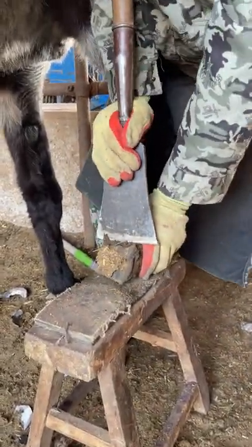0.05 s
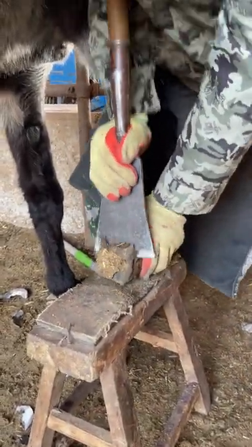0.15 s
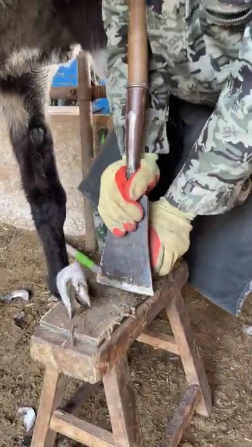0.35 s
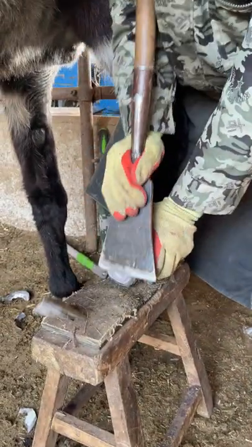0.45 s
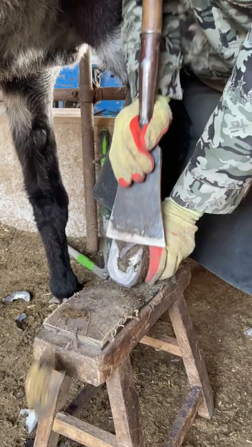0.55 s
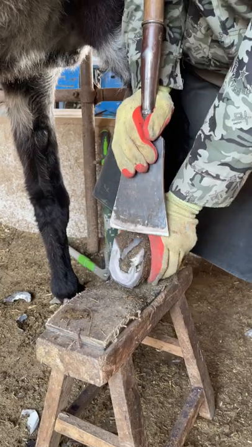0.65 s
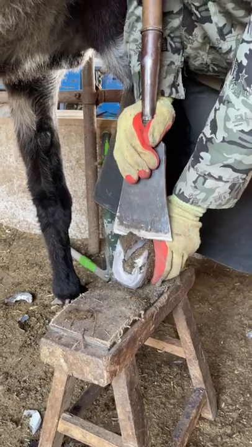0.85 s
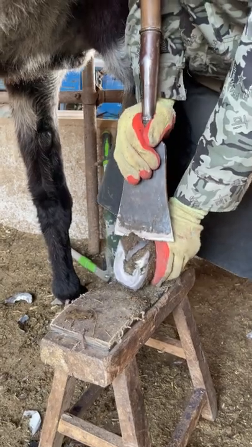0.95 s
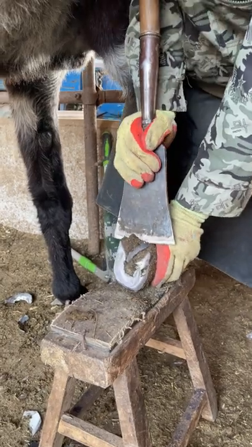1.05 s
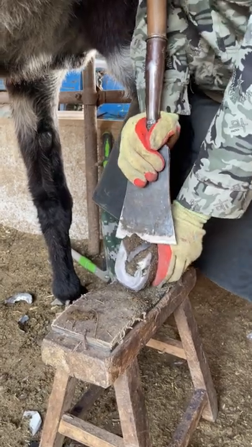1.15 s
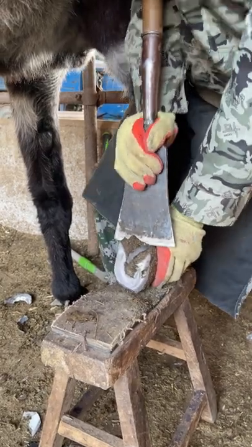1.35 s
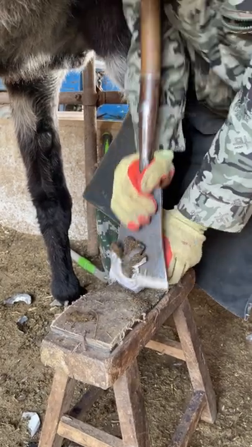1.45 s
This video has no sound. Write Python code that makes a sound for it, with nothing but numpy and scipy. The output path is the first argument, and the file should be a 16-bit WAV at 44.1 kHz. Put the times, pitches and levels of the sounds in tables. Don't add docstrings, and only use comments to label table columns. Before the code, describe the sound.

A blade cuts hoof with a brief rasping crunch, then knocks hard on a wooden stool; faint ticks and distant sparrows follow over low yard rumble, before a softer cut starts. Close stereo pickup, open shed.

```python
import sys
import numpy as np
from scipy import signal
from scipy.fft import rfft, irfft
from scipy.io import wavfile

SR = 44100
rng = np.random.default_rng(int(sys.argv[2]) if len(sys.argv) > 2 else 0)


def materialize(psi):
    bounded = np.clip(np.atleast_2d(psi).T, -1, 1)
    quanta = np.round(bounded * 32767).astype(np.int16)
    wavfile.write(sys.argv[1], SR, quanta)


def how_loud(loudness_db):
    steps = np.asarray(loudness_db, float) / 20
    return 10 ** steps


N = 66150

# (frequency [Hz], level [dB per Hz])
AIR_SPECTRUM = [(35, -1), (60, 4.5), (125, -6), (300, -18), (800, -31), (3000, -36.5), (6000, -40.5),
                (10000, -35.5)]
# (time [s], level [dB])
RUMBLE_SWELL = [(0, 1), (.15, 0), (.4, 5), (.57, -2), (.67, 4), (.76, -8), (.82, 3), (1.08, -1.5),
                (1.14, 4.5), (1.24, -1.5), (1.4, 2), (1.5, -4)]
# (time [s], level [dB])
RUSTLE_SWELL = [(0, -69), (.17, -67), (.33, -56), (.5, -59), (.67, -67.5), (.72, -76), (.78, -73),
                (.88, -74.5), (0.981, -73.5), (1.091, -65), (1.13, -78.5), (1.19, -65), (1.36, -67.5)]
# (time [s], level [dB], chatter share [0-1], chatter pitch [Hz])
FIRST_CUT = [
    (.15, -59, 0.06, 2595),
    (.19, -54, 0, 2604),
    (.2, -33.5, 0.13, 2600),
    (.212, -39, 0.33, 2608),
    (.23, -31, 0.7, 2845),
    (.244, -29.5, 0.36, 2950),
    (.267, -36, 0.1, 2806),
    (.272, -17.5, 1, 2552),
    (.277, -31.5, 0.2, 2540),
]
# (time [s], level [dB], chatter share [0-1], chatter pitch [Hz])
SECOND_CUT = [
    (1.37, -65, 0.2, 2414),
    (1.40, -58, 0.05, 2412),
    (1.418, -48, 0.15, 2468),
    (1.423, -40.5, 0.23, 2410),
    (1.45, -40, 0.06, 2298),
    (1.464, -37, 0.03, 2130),
    (1.5, -35, 0.01, 2240),
]
# (frequency [Hz], level [dB per Hz])
HORN_SPECTRUM = [(200, -3.5), (700, -6.5), (1800, -4), (4200, -7.5), (5700, -5.5), (9500, -3), (11500, -13),
                 (14500, -35)]
# (multiple of pitch, level [dB])
CHATTER_OVERTONES = [(1, -6.5), (2, -16.5), (3, -17), (4, -25)]
# (frequency [Hz], width [Hz], level [dB])
STOOL_SHAKE = [(85, 9.5, -1), (261, 43, -8)]
# (time [s], level [dB], frequency [Hz], width [Hz], t60 [s])
TICK_EVENTS = [(0.1994, -27.5, 1180, 695, 0.022), (0.227, -28, 2700, 600, 0.017),
               (.2395, -29, 3200, 600, 0.022), (.245, -34, 6400, 400, 0.018), (.249, -24, 2940, 600, 0.023),
               (0.415, -21.5, 9740, 2900, 0.015), (0.4697, -44, 5980, 6000, 0.035),
               (0.5469, -41, 1210, 1210, 0.019), (0.548, -42.5, 593, 70, 0.074),
               (0.639, -46.5, 990, 1013, 0.024), (0.694, -45, 2300, 504, 0.012),
               (0.7277, -31, 2200, 600, 0.011), (0.7283, -40, 3940, 900, .01),
               (.765, -39.5, 250, 60, 0.061), (0.766, -53, 527, 80, 0.072), (.778, -51, 2300, 910, 0.055),
               (0.7608, -49.5, 8230, 4880, 0.082), (0.760, -51, 1196, 1530, 0.086),
               (0.848, -41, 9740, 4950, 0.011), (0.914, -47, 8580, 4980, 0.014),
               (0.9745, -46.5, 6510, 2020, 0.021), (.992, -48, 5000, 6000, 0.014),
               (1.085, -63.5, 1197, 1210, .03), (1.174, -55, 5040, 6000, .1),
               (1.336, -44, 7100, 1500, 0.013), (1.344, -37.5, 1050, 350, 0.014),
               (1.405, -41, 6000, 8000, 0.0098), (1.419, -36, 2500, 4950, 0.0097),
               (1.4231, -29, 500, 300, 0.016), (1.4273, -26.5, 2100, 1600, 0.011),
               (1.4579, -20, 2178, 885, 0.013), (1.460, -25.5, 1290, 350, 0.032),
               (1.468, -28, 6330, 3000, 0.009), (1.475, -29, 1290, 400, .02),
               (1.479, -29, 5460, 500, 0.038), (1.497, -20.5, 5050, 7000, .015)]
# (time [s], level [dB], frequency [Hz], t60 [s])
STEEL_RINGS = [
    (.470, -60, 8200, .15),
    (.471, -62, 9650, .15),
    (.472, -58, 5080, .2),
    (.490, -64, 2350, .4),
    (.630, -69, 2350, .3),
    (.650, -63, 9600, .35),
    (.840, -69, 1720, 1.2),
    (.880, -63, 4700, .2),
    (.970, -70, 1720, .8),
]
# (time [s], level [dB], tilt [dB per octave])
EDGE_CONTACTS = [(.2750, -12, 5), (0.2766, -9.5, 2), (.2773, -1, 0.5), (.2788, -4.5, 2), (0.2794, -4, -3.5),
                 (0.2803, -5.5, -1), (.2816, -10.5, -5.5), (.2824, -9, -1.5), (0.2865, -16, -1),
                 (.2871, -23, -2), (0.2888, -21, -4)]
# (frequency [Hz], level [dB], t60 [s])
SEAT_MODES = [(600, -8.5, 0.0073), (787, -6.5, 0.011), (935, -11, 0.012), (1083, -6, 0.016),
              (1413, -4.5, 0.013), (1700, -7.5, 0.0088), (2098, -20, 0.013), (2392, -5.5, 0.017),
              (2877, -6, 0.013), (3420, -13, 0.012), (4110, -13.5, 0.0054), (6250, -24, .005),
              (7900, -22, 0.0054), (9930, -23.5, 0.011)]
# (start [s], level [dB], frequency [Hz], t60 [s], push length [s])
FRAME_THUDS = [
    (.2825, -24, 355, .05, .0015),
    (.2847, -7, 240, .045, .0015),
    (.2895, -8, 86, .11, .005),
    (.279, -22, 430, .03, .001),
]
# (frequency [Hz], level [dB per Hz])
ECHO_SPECTRUM = [(40, -9.5), (85, -0.5), (250, 0.5), (600, -15), (1300, -14.5), (5000, -28), (10000, -33.5),
                 (12000, -30)]
# (time [s], length [s], level [dB], start pitch [Hz], end pitch [Hz])
SPARROW_CHIRPS = [
    (0.497, 0.021, -46.5, 5190, 4610),
    (0.507, 0.048, -45, 4187, 3806),
    (0.729, 0.029, -48, 5290, 5030),
    (.762, 0.04, -44, 4310, 3747),
    (0.813, 0.028, -49, 3726, 2890),
    (1.172, 0.026, -51, 4400, 3885),
    (1.188, 0.06, -54, 3192, 2613),
    (1.22, 0.057, -55, 3900, 3400),
    (1.27, .05, -57, 3110, 2790),
    (1.188, 0.03, -57.5, 6580, 5900),
]
# (frequency [Hz], lead [half turns])
LEFT_LEAD = [(0, 0), (700, .12), (1950, 0), (3000, .4), (4300, .55), (5950, 2), (9150, 3), (11900, 4)]
# (frequency [Hz], level [dB])
PORT_TILT = [(50, 0.7), (400, -3.5), (1300, -2), (2000, 0)]
# (frequency [Hz], share [0-1])
PORT_DIFFERENCE = [(100, 0.03), (750, 0.4), (1400, 0.5), (3300, 0.5), (4300, 0.51), (4800, 0.43),
                   (5400, 0.7), (11000, 0.2)]
# (centre [Hz], width [Hz])
PHASE_LOCKS = [(1930, 340), (5950, 560), (9100, 900)]

TIME = np.arange(N) / SR
GRAINS_PER_S, GRAIN_SPREAD_DB = 20000, 2.0
CHATTER_WANDER, CHATTER_FLUTTER_DB = 0.11, 4.0
CRACK_S, CRACK_DB, CRACK_T60_S = 0.275, -21.5, 0.016
ECHO_S, ECHO_DB, ECHO_T60_S = 0.29, -32.5, 0.7
SHED_DB, SHED_T60_S, SHED_CUT_HZ = -11.5, 0.62, 5600
SMEAR_DB, SMEAR_T60_S = 0.5, 0.012


def rms_one(x):
    return x / np.sqrt(np.mean(x ** 2) + 1e-20)


def low_pass(x, order, hz):
    return signal.sosfilt(signal.butter(order, hz, fs=SR, output="sos"), x)


def at_hz(points, hz):
    table_hz, value = np.transpose(points)
    return np.interp(np.log(hz + 1), np.log(table_hz), value)


def colour(x, points):
    gain = how_loud(at_hz(points, np.fft.rfftfreq(N, 1 / SR)))
    return rms_one(irfft(rfft(x) * gain, N))


def drift(rate):
    r = np.exp(-2 * np.pi * rate / SR)
    settled = signal.lfilter([1], [1, -2 * r, r * r], rng.standard_normal(N + SR))[SR:]
    return rms_one(settled)


def ring(x, hz, t60):
    r, w = how_loud(-60 / (t60 * SR)), 2 * np.pi * hz / SR
    return signal.lfilter([0, np.sin(w)], [1, -2 * r * np.cos(w), r * r], x + 1e-18)


def resonance(x, hz, width_hz):
    r = np.exp(-np.pi * width_hz / SR)
    poles = [1, -2 * r * np.cos(2 * np.pi * hz / SR), r * r]
    return signal.lfilter([(1 - r * r) / 2, 0, (r * r - 1) / 2], poles, x)


def after(s, t60):
    t = TIME - s
    return (t >= 0) * how_loud(-60 * np.maximum(t, 0) / t60)


def tail(x, t60):
    decay = rng.standard_normal((2, N)) * after(0.0016, t60)
    decay = decay / np.sqrt(np.sum(decay[0] ** 2))
    return signal.fftconvolve(x[None], decay, axes=1)[:, :N]


def air():
    out = np.array([colour(rng.standard_normal(N), AIR_SPECTRUM) for side in range(2)])
    rumble = signal.sosfiltfilt(signal.butter(1, 138.6, fs=SR, output="sos"), out)
    out = out + rumble * (how_loud(np.interp(TIME, *np.transpose(RUMBLE_SWELL))) - 1)
    low = low_pass(out, 1, 2500)
    rustle_db = np.interp(TIME, *np.transpose(RUSTLE_SWELL))
    lift_db = np.minimum(rustle_db - np.median(rustle_db), 6)
    swell = how_loud(0.8 * lift_db + 1.0 * drift(15))
    patchy = how_loud(0.6 * drift(23))
    return how_loud(-42.5) * (low * patchy + (out - low) * swell)


def horn_rasp():
    size_db = GRAIN_SPREAD_DB * np.minimum(rng.exponential(1, N), 5)
    sizes = how_loud(size_db) * rng.choice([-1, 1], N)
    torn = rng.random(N) < GRAINS_PER_S / SR
    return colour(sizes * torn, HORN_SPECTRUM)


def edge_chatter(pitch):
    phase = 2 * np.pi * np.cumsum(pitch * (1 + CHATTER_WANDER * drift(300))) / SR
    out = 0
    for multiple, db in CHATTER_OVERTONES:
        out = out + how_loud(db + CHATTER_FLUTTER_DB * drift(220)) * np.cos(multiple * phase)
    return rms_one(out)


def stool_shake(pressure):
    noise, push = rng.standard_normal(N), np.minimum(pressure, how_loud(-37.5))
    out = 0
    for hz, width_hz, db in STOOL_SHAKE:
        steady = np.std(resonance(noise, hz, width_hz))
        out = out + how_loud(db) * resonance(push * noise, hz, width_hz) / steady
    return out


def cuts():
    pressure, share, pitch = 0, 0, 0
    for cut in (FIRST_CUT, SECOND_CUT):
        s, db, mix, hz = np.transpose(cut)
        inside = (TIME >= s[0]) & (TIME <= s[-1])
        pressure = pressure + inside * how_loud(np.interp(TIME, s, db))
        share = share + inside * np.clip(np.interp(TIME, s, mix), 0, 1)
        pitch = pitch + inside * np.interp(TIME, s, hz)
    edge = np.sqrt(1 - share) * horn_rasp() + np.sqrt(share) * edge_chatter(pitch)
    return pressure * edge + stool_shake(pressure)


def burst(noise, s, db, hz, width_hz, t60, rise_s):
    tone = rms_one(resonance(resonance(noise, hz, width_hz), hz, width_hz))
    return how_loud(db) * tone * after(s, t60) * np.clip((TIME - s) / rise_s, 0, 1)


def ticks():
    noise = rng.standard_normal(N)
    crumbs, steel = 0, 0
    for s, db, hz, width_hz, t60 in TICK_EVENTS:
        crumbs = crumbs + burst(noise, s, db - 3, hz, width_hz, t60, rise_s=0.0011)
    for s, db, hz, t60 in STEEL_RINGS:
        steel = steel + burst(noise, s, db + 1, hz, 60, t60, rise_s=0.008)
    return low_pass(crumbs, 8, 12300) + steel


def seat_ring():
    s, db, tilt_db = np.transpose(EDGE_CONTACTS)
    out = 0
    for hz, mode_db, t60 in SEAT_MODES:
        octaves = np.log2(min(hz, 3000) / 1500)
        click_db = db + tilt_db * octaves + mode_db - 5 + rng.normal(0, 2.5, len(s))
        clicks = np.zeros(N)
        clicks[(s * SR).astype(int)] = how_loud(click_db) * rng.choice([-1, 1], len(s))
        out = out + ring(clicks, hz, t60)
    return signal.sosfilt(signal.butter(3, 400, "high", fs=SR, output="sos"), out)


def frame_thud():
    out = 0
    for start, db, hz, t60, push_s in FRAME_THUDS:
        force = np.sin(np.pi * np.clip((TIME - start) / push_s, 0, 1))
        out = out + how_loud(db) * ring(force / force.sum(), hz, t60)
    return out


def horn_crack():
    held = (TIME > CRACK_S) & (TIME < CRACK_S + 0.008)
    shape = np.maximum(after(CRACK_S + 0.011, CRACK_T60_S), held)
    return how_loud(CRACK_DB) * colour(rng.standard_normal(N), HORN_SPECTRUM) * shape


def knock():
    return seat_ring() + frame_thud() + horn_crack()


def echo():
    sides = np.array([colour(rng.standard_normal(N), ECHO_SPECTRUM) for side in range(2)])
    return how_loud(ECHO_DB) * after(ECHO_S, ECHO_T60_S) * sides


def sparrows():
    out, warble_hz = 0, 250 * drift(202)
    for s, length, db, start_hz, end_hz in SPARROW_CHIRPS:
        along = np.clip((TIME - s) / length, 0, 1)
        pitch = start_hz + (end_hz - start_hz) * along + warble_hz
        whistle = np.sin(2 * np.pi * np.cumsum(pitch) / SR)
        out = out + how_loud(db) * np.sin(np.pi * along) * whistle
    return tail(out, 0.75)


def ports(near, far):
    hz = np.fft.rfftfreq(2 * N, 1 / SR)
    free = np.prod([1 - np.exp(-(2 * (hz - centre) / width) ** 4) for centre, width in PHASE_LOCKS], axis=0)
    lead = np.interp(hz, *np.transpose(LEFT_LEAD)) + np.clip((hz - 13300) / 2000, 0, 0.5)
    locked = np.round(lead)
    turn = np.exp(0.5j * np.pi * (locked + free * (lead - locked)))
    tilt = how_loud(at_hz(PORT_TILT, hz) * free / 2)
    apart = np.clip(at_hz(PORT_DIFFERENCE, hz), 0, 1) * free * (hz < LEFT_LEAD[-1][0])
    common = rfft(near, 2 * N) + np.sqrt(1 - apart ** 2) * rfft(far[0], 2 * N)
    differing = apart * rfft(far[1], 2 * N)
    left = (common + differing) * turn * tilt
    right = (common - differing) / turn / tilt
    return irfft([left, right], 2 * N)[:, :N]


def scene():
    yard = air()
    work = cuts() + ticks()
    near = work + knock()
    shed = how_loud(SHED_DB) * low_pass(tail(work, SHED_T60_S), 1, SHED_CUT_HZ)
    far_cut = signal.cheby2(10, 50, 11300 * 1.04, fs=SR, output="sos")
    far = signal.sosfilt(far_cut, shed + echo() + sparrows() + yard)
    smear = how_loud(SMEAR_DB) * tail(resonance(near, 3000, 1985), SMEAR_T60_S) * [[0], [1]]
    return ports(near, far + smear)


def band_limit(x):
    return signal.sosfilt(signal.butter(12, 14980, fs=SR, output="sos"), x)


def record(dry):
    low_cut = signal.butter(4, 41, "high", fs=SR, output="sos")
    top_cut = signal.butter(10, 14600, fs=SR, output="sos")
    rounded = 1.209 * np.tanh(dry / 1.161)
    mix = signal.sosfilt(np.vstack([low_cut, top_cut]), rounded)
    return band_limit(mix)


dry = scene()
out = record(dry)
materialize(out)
```